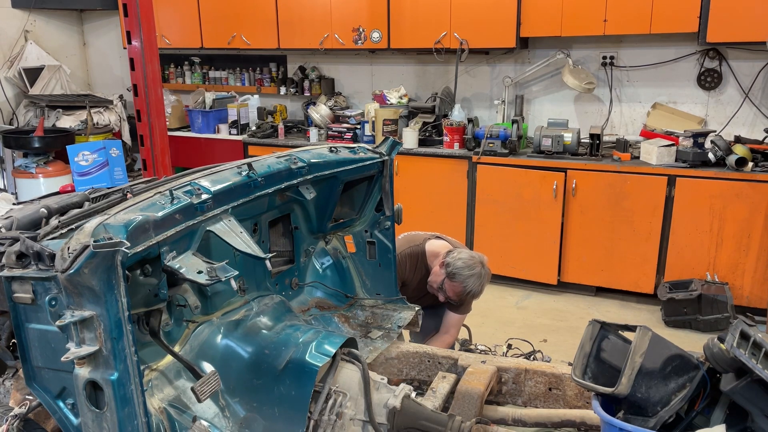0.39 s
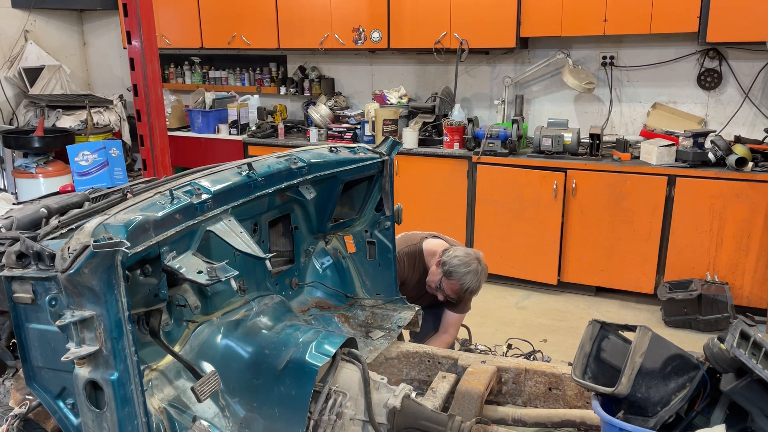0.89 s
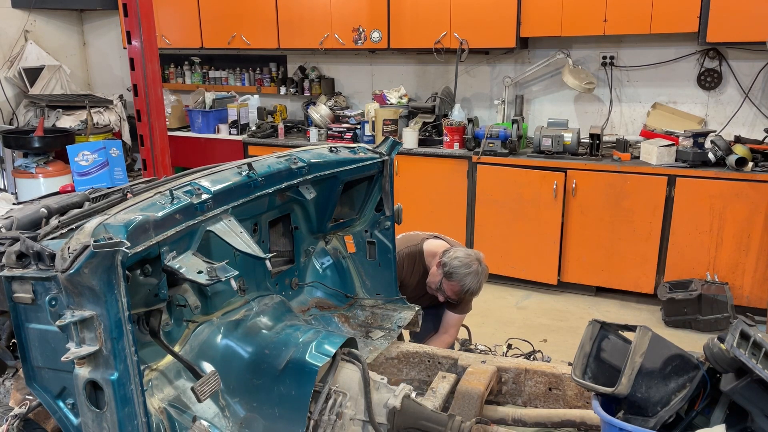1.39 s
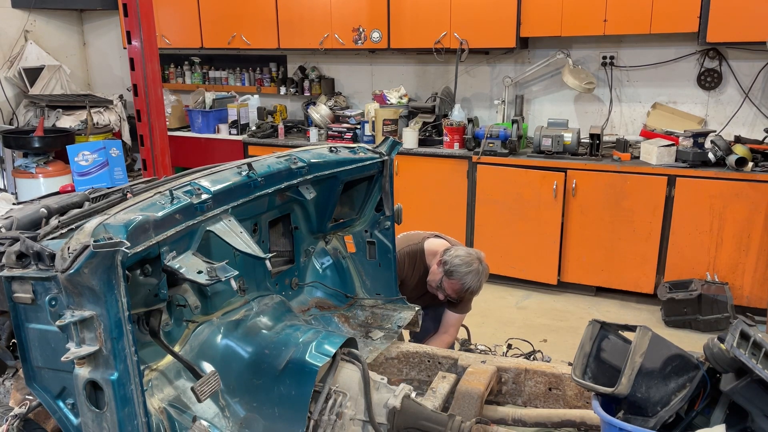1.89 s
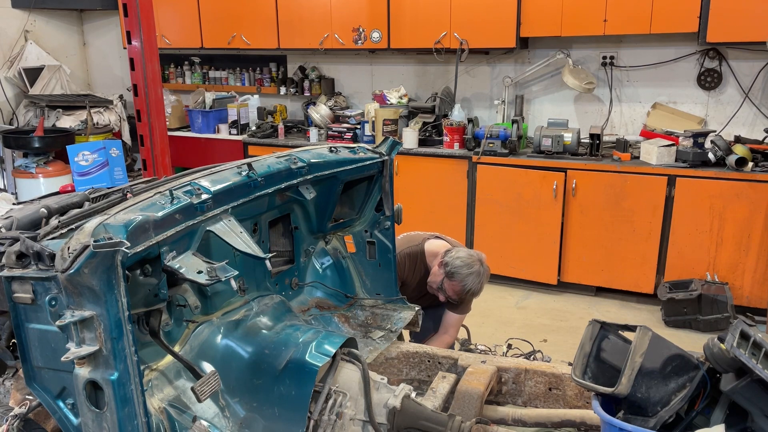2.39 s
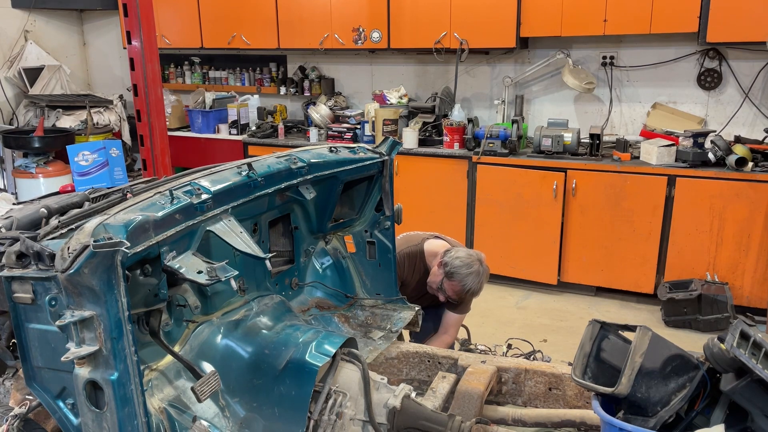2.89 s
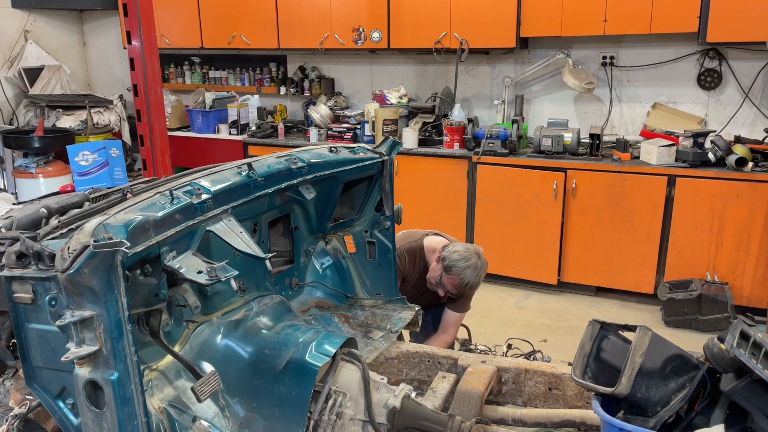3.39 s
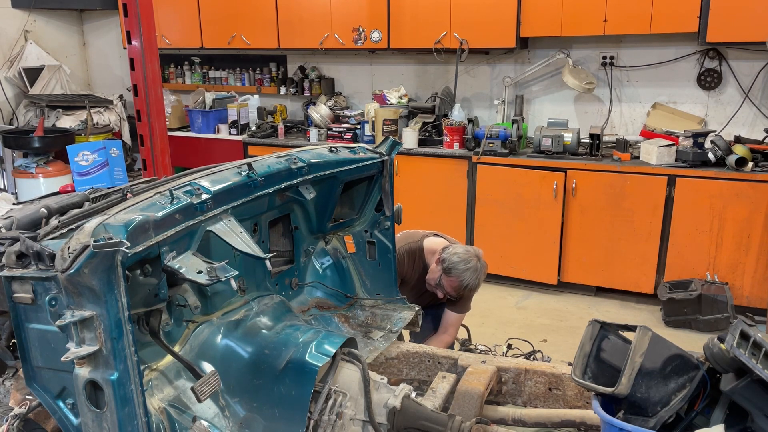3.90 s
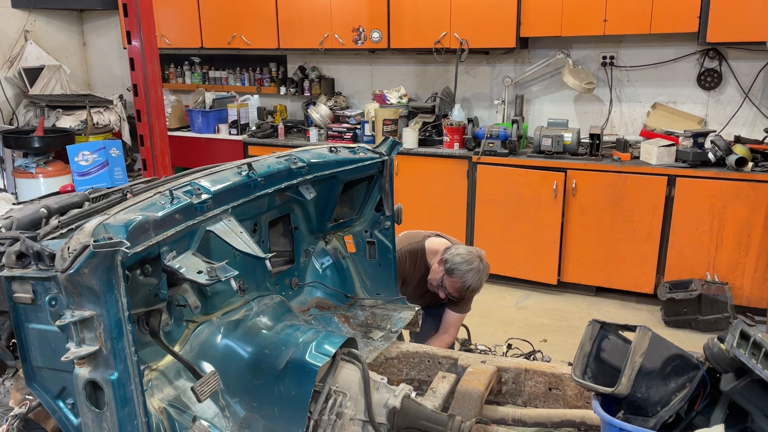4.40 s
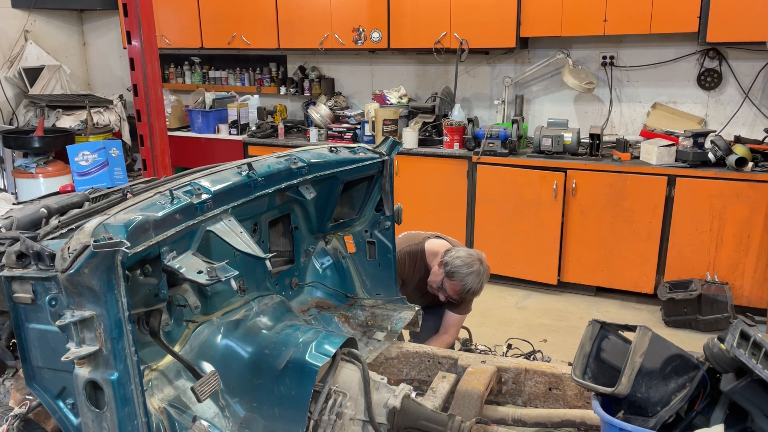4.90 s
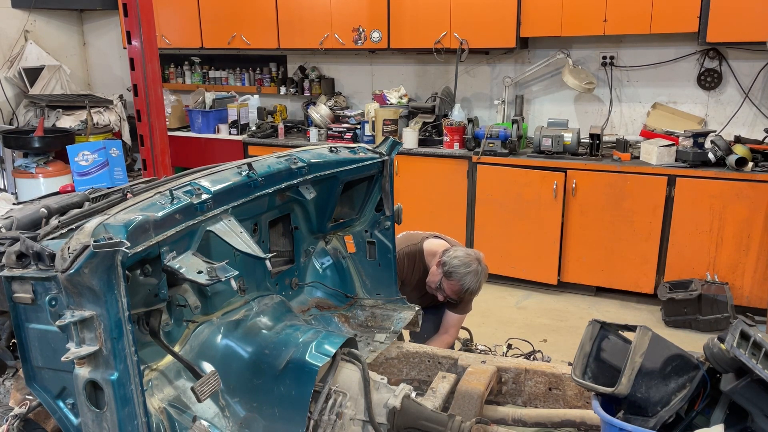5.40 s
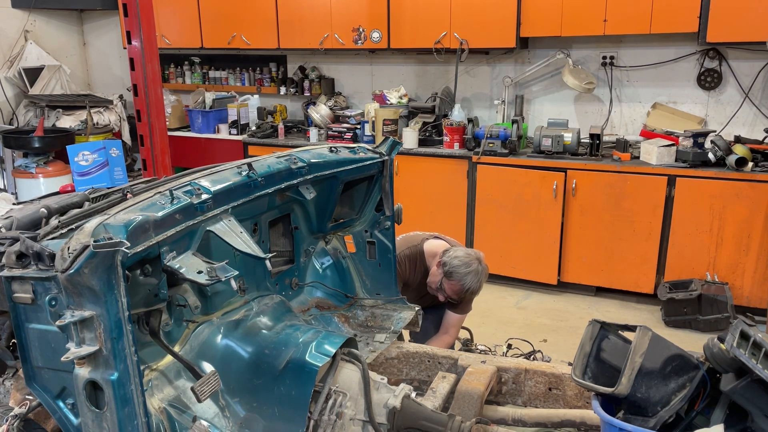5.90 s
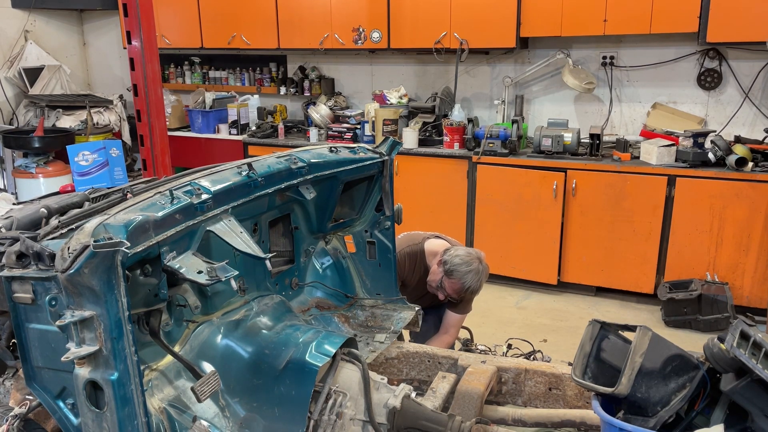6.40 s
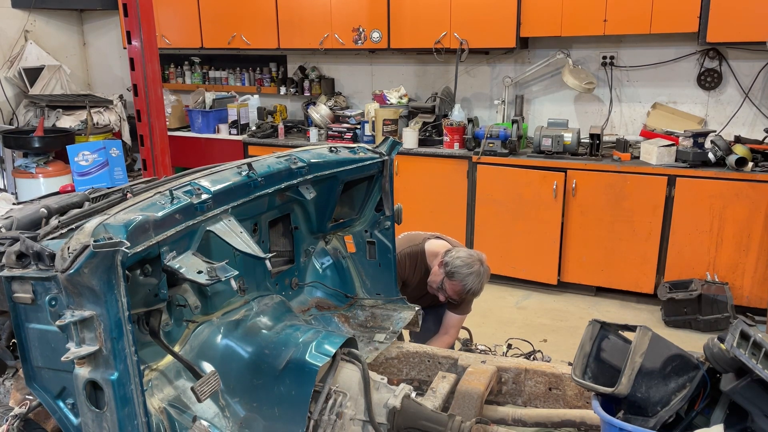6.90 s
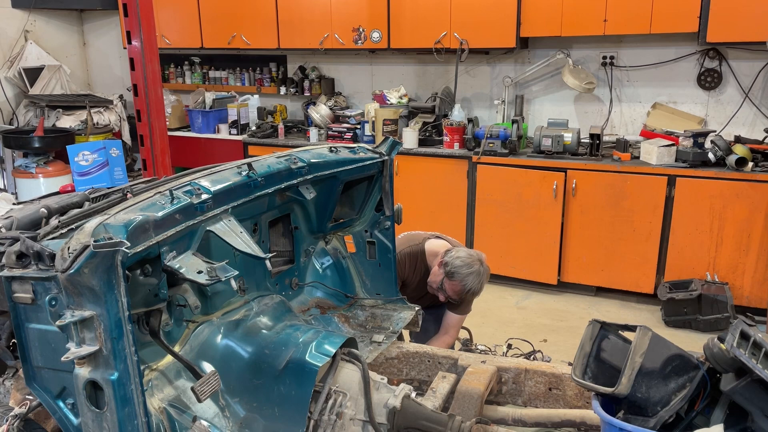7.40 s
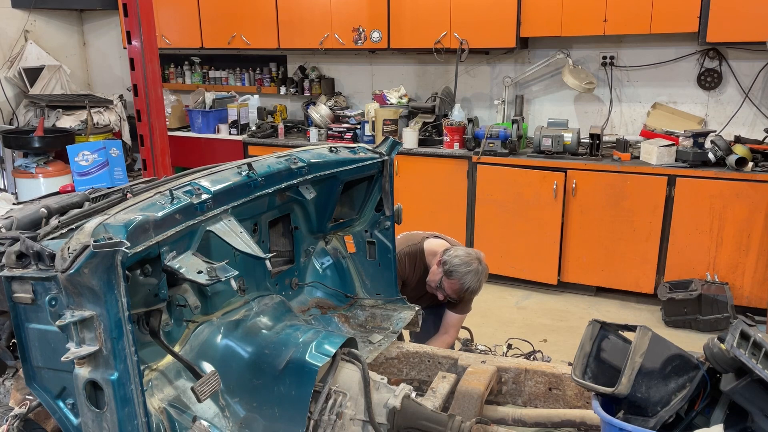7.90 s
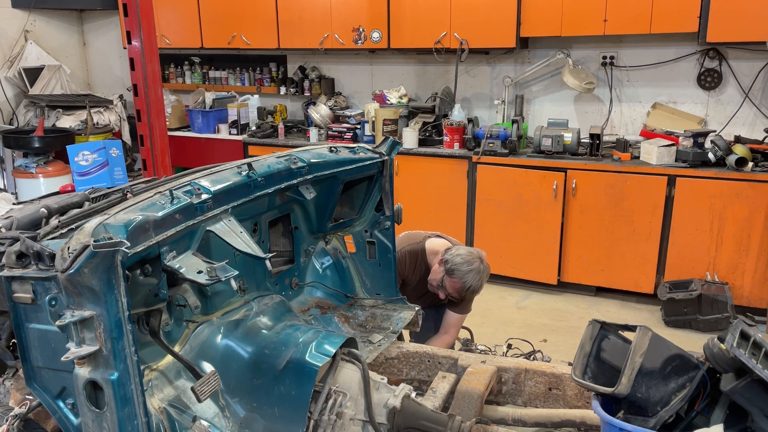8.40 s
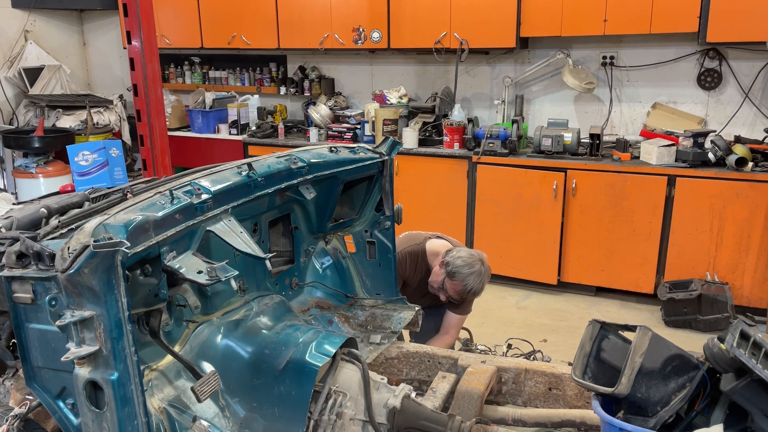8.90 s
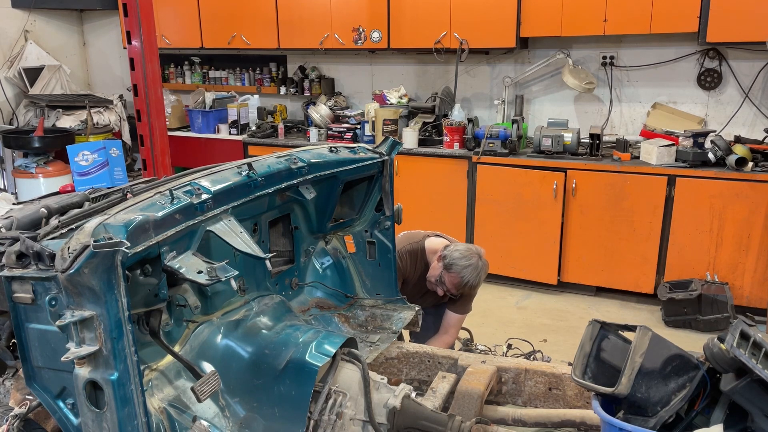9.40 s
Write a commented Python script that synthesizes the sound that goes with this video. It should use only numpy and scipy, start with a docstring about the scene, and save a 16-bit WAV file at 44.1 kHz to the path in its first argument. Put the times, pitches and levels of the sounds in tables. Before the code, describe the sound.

In a closed garage, a pneumatic impact wrench works on a bare car shell. A burst is already under way at the start, then four more follow, each about a second or less. Sharp metallic cracks rattle at roughly sixteen to twenty per second over rushing air, making steel panels boom and clang. Between bursts, short reverb fades to faint hum, ticks and rustling. Stereo microphone a few metres away.

```python
"""Impact wrench in a closed garage

An air impact wrench hammers a tight bolt on a bare steel car shell in five bursts. Each blow is a noise
crack and a socket ring, with damped sine modes for the panels that boom and clang. Filtered noise gives
the rush of the air motor and, in the pauses, faint rustling; small ticks are noise bursts with pings.
The room adds echoes and about half a second of diffuse tail, over steady air noise, hum and whine."""
import sys
import numpy as np
from scipy import signal
from scipy.fft import rfft, irfft, next_fast_len
from scipy.io import wavfile
from scipy.ndimage import uniform_filter1d

SR = 44100
rng = np.random.default_rng(int(sys.argv[2]) if len(sys.argv) > 2 else 0)


def attenuation_scalar(level_db):
    """Turn a level in dB into a linear amplitude multiplier (20 dB per decade)."""
    decades = np.asarray(level_db, float) / 20
    return 10 ** decades


def wav_out(sig):
    """Save sig, one row per channel (or a flat mono array), as 16-bit PCM at SR to the path in sys.argv[1]."""
    wavfile.write(sys.argv[1], SR, np.round(np.clip(np.atleast_2d(sig).T, -1, 1) * 32767).astype(np.int16))


N = 420273


def evened(x):
    """Scales a signal to an rms of one."""
    return x / np.sqrt(np.mean(x ** 2) + 1e-20)


def read(points, hz):
    """Reads a curve of (f/Hz, value) points along a logarithmic frequency axis."""
    f, value = np.transpose(points)
    return np.interp(np.log(hz + 1), np.log(f + 1), value)


def coloured(x, points):
    """Zero-phase filter along the last axis, from (f/Hz, gain/dB) points."""
    size = next_fast_len(x.shape[-1])
    gain = attenuation_scalar(read(points, np.fft.rfftfreq(size, 1 / SR)))
    return irfft(rfft(x, size) * gain, size)[..., :x.shape[-1]]


def clicks(s, db):
    """Single-sample impulses at the given seconds and levels."""
    x = np.zeros(N)
    at = np.clip(np.round(np.asarray(s) * SR).astype(int), 0, N - 1)
    np.add.at(x, at, attenuation_scalar(np.asarray(db)))
    return x


def ring(hz, t60, rise, turn=0):
    """One dying sine a row, swelling in over rise seconds, starting turn cycles into its phase."""
    t = np.arange(SR // 4) / SR
    fade = attenuation_scalar(-60 * t / np.maximum(t60, .01)[:, None]) * (1 - np.exp(-t / abs(rise)))
    return fade * np.sin(2 * np.pi * (hz[:, None] * t + turn))


def burst(s, db, rise, t60, colour):
    """Fresh noise under a sharp envelope at every hit."""
    t = np.arange(SR // 8) / SR
    shape = (1 - np.exp(-t / abs(rise))) * attenuation_scalar(-60 * t / abs(t60))
    envelope = signal.oaconvolve(clicks(s, db), shape)[:N]
    return envelope * evened(coloured(rng.standard_normal(N), colour))


def add(mix, s, sound):
    """Adds a sound into the mix at s seconds, trimmed where it overhangs either end."""
    at = round(s * SR)
    part, sound = mix[max(at, 0):], sound[max(-at, 0):]
    part[:len(sound)] += sound[:len(part)]


def background():
    """Diffuse room noise with hum lines whose pitch and level waver at random."""
    # hum and whine lines: f/Hz, relative level/dB
    hum_lines = [(62, -74.5), (118.4, -72), (280, -80), (420, -75.5), (587, -92), (613.7, -74.5),
                 (672, -100), (732, -73), (920, -76), (1034, -79.5), (1378, -83), (5165, -89)]
    # spectrum of the room noise: f/Hz, relative level/dB
    air_colour = [(25, -16), (58, 7), (121, -9), (413, -6), (745, -8.5), (1090, -16.5), (2420, -23.5),
                  (5200, -30.5), (7000, -33), (10000, -37.5), (13000, -39), (16000, -36.5)]
    t = np.arange(N) / SR
    out = evened(coloured(rng.standard_normal((2, N)), air_colour)) * attenuation_scalar(-59.5)
    for hz, db in hum_lines:
        waver = evened(uniform_filter1d(rng.standard_normal((2, N // 100 + 1)), 40, 1))
        drift, swell = np.repeat(waver, 100, 1)[:, :N]
        phase = hz * t + 2.0 * np.cumsum(drift) / SR + rng.random()  # drifts by about 2 Hz
        line = np.sqrt(2) * attenuation_scalar(db + 2.2 * swell) * np.sin(2 * np.pi * phase)
        out += line * np.array([[1], [.4]])
    return out * attenuation_scalar([[-0.5], [1.5]])


def motor(rows):
    """Exhaust rush, lumpy with the rattle of vanes; the shell rumbles most as the motor takes up the slack."""
    # trigger of the air motor: pressed t/s, released t/s, relative level/dB
    trigger = [(-.074, 0.598, -25.5), (1.827, 3.075, -27), (4.337, 5.299, -26.5), (6.486, 7.546, -27),
               (8.467, 9.122, -27.5)]
    # spectrum of the exhaust: f/Hz, relative level/dB
    rush_colour = [(300, -11), (900, 3), (1400, 0), (2500, -3.5), (5000, 0), (7000, 1), (11000, -2),
                   (16000, -8.5)]
    # spectrum of the shell's rumble: f/Hz, relative level/dB
    rumble_colour = [(40, -8), (100, -12.5), (200, -2), (400, -0.5), (800, -1.5), (1300, -12.5),
                     (2000, -27), (4000, -65)]
    sag_db_per_s = -3.0  # the air pressure drops
    open_s, open_db, stop_s = 0.018, -20.5, 0.03  # the valve opens from a faint leak; the motor runs down
    stall_db, stall_s, spin_up_s = -9.5, 0.024, 0.022
    t, level, slack_db = np.arange(N) / SR, np.zeros(N), np.zeros(N)
    for press, release, db in trigger:
        since = np.maximum(t - press, 0)
        held = (since > 0) * np.clip((release - t) / stop_s + 1, 0, 1)
        opening_db = open_db * np.exp(-(since / open_s) ** 2)
        level += attenuation_scalar(db + sag_db_per_s * since + opening_db) * held
        # the air hisses before the parts move
        slack_db += (6.9 * np.exp(-since / 0.068) - 21.0 * np.exp(-since / 0.024)) * held
    # each blow stalls the rotor, which then gathers speed again
    last_blow = np.maximum(np.searchsorted(rows[:, 0], t) - 1, 0)
    after = np.maximum(t - rows[last_blow, 0], 0)
    dip_db = stall_db * (1 - np.exp(-after / stall_s)) * np.exp(-(after / spin_up_s) ** 2 / 2)
    lumps_db = 2.44 * evened(uniform_filter1d(rng.standard_normal(N), 130))
    rush = evened(coloured(rng.standard_normal(N) * attenuation_scalar(lumps_db), rush_colour))
    rumble = evened(coloured(rng.standard_normal(N), rumble_colour)) * attenuation_scalar(slack_db + 0.1)
    return (rush + rumble) * level * attenuation_scalar(dip_db)


def blows():
    """Quick light blows until the bolt binds, then slower, boomier ones: rows of t/s, boom, clang, crack/dB."""
    # rhythm of each burst: first blow t/s, number of blows, gap/s while the socket is loose,
    # gap/s once the bolt binds, delay/s of the last blow
    rhythm = [(-.0213, 11, .0488, .0641, .0045), (1.8835, 20, .0456, .065, .0017),
              (4.3886, 16, .0503, .0633, .0088), (6.536, 17, .048, .065, .002),
              (8.5128, 11, .0509, .0641, .0132)]
    # force of each burst, relative levels: boom of the large panels/dB, boom while loose/dB,
    # clang of the small panels/dB, slope of the clang/(dB/s), crack of hammer on anvil/dB
    force = [(-26.5, -36.5, -32.5, 2, -18), (-26.5, -36, -28, -3, -17.5), (-26.5, -35, -30, -4, -17),
             (-27, -34.5, -28.5, -2.5, -18), (-26, -40.5, -29.5, -1, -18)]
    # blows that land squarely: t/s, extra crack/dB, extra clang/dB
    hard = [(.36, 2, 0), (2.02, 3.5, 0.5), (4.54, 1.5, -7), (4.83, 3.5, -0.5), (6.68, 6.5, -1),
            (7.04, 0.5, 1), (8.66, 4.5, -2.5), (9.03, 5.5, .1)]
    # free blows, then how many binding and the final delay take to build up
    loose_blows, bind_blows, tire_blows = 4.11, 1.11, .7
    boom_sag, crack_sag = -2, -4.0  # dB per s, as the air pressure drops
    late_db_per_ms, first_db, uneven_db = -0.74, -1.5, 0.88  # late and first blows are weak; all scatter
    rows = []
    for (first, count, quick, slow, delay), (boom, loose, clang, clang_sag, crack) in zip(rhythm, force):
        k = np.arange(count + 1)
        bound = np.maximum(1 - np.exp((loose_blows - k) / bind_blows), 0) * (k > loose_blows)
        late = delay * np.exp((k[:-1] - count + 1) / tire_blows)
        gap = quick + (slow - quick) * bound[:-1] + late
        since = np.cumsum(gap * (k[:-1] > 0))
        weak = late_db_per_ms * late * 1e3 + first_db * (k[:-1] == 0)
        boom_db = loose + (boom - loose) * bound[1:] + boom_sag * since + weak
        clang_db = clang + clang_sag * since + weak
        crack_db = crack + crack_sag * since + weak
        rows += zip(first + since, boom_db, clang_db, crack_db)
    rows = np.array(rows)
    rows[:, 1:] += uneven_db * rng.standard_normal((len(rows), 3))
    for s, crack_db, clang_db in hard:
        nearest = np.argmin(abs(rows[:, 0] - s))
        rows[nearest, 2:] += [clang_db, crack_db]
    return rows


def panels(s, boom_db, clang_db, spread_db):
    """Panel modes answer nearly alike each blow; the direction of turning changes which ones lead."""
    # panel modes: f/Hz, relative level/dB turning one way, relative level/dB turning the other way, t60/s
    panel_modes = [(61, -21, -31.5, 0.5), (98, -23, -13.5, 0.47), (113.6, -3, -15, 0.18),
                   (145.2, -7.5, -30.5, 0.42), (189.9, -8.5, -6, 0.27), (223.4, -2, -11.5, 0.45),
                   (262.1, -1, 1, 0.27), (281.6, 7, 4.5, 0.2), (306.4, 9, 5.5, 0.15), (321.2, 3, -1, 0.31),
                   (385, -15, -14, 0.097), (403, 8, -2.5, 0.091), (434, -8, 3.5, 0.27),
                   (510, 12.5, 9.5, 0.06), (577, -30.5, 6, 0.11), (597, -0.5, 2, 0.075),
                   (663, 1.5, -10.5, 0.12), (721, -3, -2.5, 0.18), (833.7, 2, 2.5, 0.13),
                   (900.5, 2.5, 2, 0.12), (988, -1, 5.5, 0.041), (1082.5, -2.5, 3, 0.077),
                   (1240, -17, -15.5, 0.029), (1331, -16.5, 4, 0.046), (1453, -1, -13, 0.039),
                   (1685, -2, -8.5, 0.084)]
    # heavily damped frame modes: f/Hz, relative level/dB one way, relative level/dB the other way, t60/s
    frame_modes = [(255, 18, 18, .05), (420, 15, 10, .035), (640, 14, 16, .03), (1100, 7, 7, .02)]
    # spans in which the wrench turns the other way: start t/s, end t/s
    reversed_spans = [(1.8, 3.1), (6.4, 7.6)]
    large_hz = 410  # modes below this belong to the large panels
    turn_spread = 0.14  # scatter of the small panels' starting phase, in cycles
    hz, ahead_db, back_db, t60 = np.transpose(panel_modes + frame_modes)
    large, out = hz < large_hz, np.zeros(N)

    def modes(turn):
        """Large panels swell in more slowly than small ones."""
        return np.where(large[:, None], ring(hz, t60, 0.0043, turn), ring(hz, t60, 0.0011, turn))

    sine, cosine = modes(0), modes(1 / 4)
    chance = rng.standard_normal((len(s), 2, len(hz)))
    for at, boom, clang, (luck, twist) in zip(s, boom_db, clang_db, chance):
        back = any(a < at < b for a, b in reversed_spans)
        strike_db = np.where(large, boom, clang + spread_db * luck)
        gains = attenuation_scalar((back_db if back else ahead_db) + strike_db)
        angle = 2 * np.pi * turn_spread * twist * ~large
        sound = gains * np.cos(angle) @ sine + gains * np.sin(angle) @ cosine
        add(out, at + 0.002958, sound)  # the panels answer 3 ms after the blow
    return out


def hammer(rows):
    """The crack of hammer on anvil and a loose socket that rings differently every time, with the panels."""
    # socket and anvil ring: f/Hz, relative level/dB, t60/s
    socket_modes = [(2114, -11, 0.21), (2504, -0.5, 0.099), (3140, -16, 0.12), (3500, -32, .05),
                    (3816, 13.5, 0.028), (4740, 6.5, 0.05), (5200, -32, .04)]
    # spectrum of the crack: f/Hz, relative level/dB
    crack_colour = [(400, -18), (1200, 4.5), (2500, 0.5), (5000, -5), (7000, -1.5), (11000, -7),
                    (16000, -8)]
    s, boom_db, clang_db, crack_db = rows.T
    hz, db, t60 = np.transpose(socket_modes)
    out = panels(s, boom_db, clang_db, 2.28) + burst(s, crack_db, 0.00092, 0.059, crack_colour)
    sine, cosine = ring(hz, t60, 0.00084), ring(hz, t60, 0.00059, turn=1 / 4)
    chance = rng.standard_normal((len(s), 2, len(hz)))
    for at, crack, luck in zip(s, crack_db, chance):
        gains = attenuation_scalar(crack + db - 24.0) * luck  # random level and phase for every mode
        add(out, at, gains[0] @ sine + gains[1] @ cosine)
    return out


def ticks():
    """Short noise ticks of metal parts settling, each with a brief sine ping and a knock in the panels."""
    # ticks and knocks of tool and parts: t/s, relative tick level/dB, relative panel knock level/dB,
    # ping f/Hz, relative ping level/dB
    tick_events = [(1, -49.5, -70, 2900, -51), (1.5163, -60, -86.5, 2750, -59),
                   (3.2002, -43, -76, 3200, -55), (3.307, -49, -85, 3600, -60),
                   (3.4185, -48.5, -81, 3050, -49), (3.6469, -39, -62.5, 4320, -51.5),
                   (5.817, -50, -76, 3400, -59), (6.506, -38, -42, 3920, -41),
                   (7.5586, -27.5, -65, 4570, -40), (8.486, -42, -42, 3900, -44),
                   (9.469, -56.5, -82.5, 3000, -71)]
    # spectrum of a tick: f/Hz, relative level/dB
    tick_colour = [(200, -9), (400, -17), (1200, 6), (3000, 0), (5000, 3), (9000, 6.5), (16000, -21)]
    s, db, knock_db, hz, ping_db = np.transpose(tick_events)
    out = burst(s, db, 0.00033, 0.05, tick_colour) + panels(s, knock_db, knock_db - 3.0, 4.0)
    pings = attenuation_scalar(ping_db)[:, None] * ring(hz, np.full(len(s), .012), .0004)
    for at, ping in zip(s, pings):
        add(out, at, ping)
    return out


def rustle():
    """Soft grainy noise that swells and fades in the pauses."""
    # faint rustling: start t/s, length/s, relative level/dB
    rustle_events = [(1.5, 0.59, -71.5), (3.413, 0.12, -75), (3.645, .12, -55.5), (5.824, 0.86, -77.5),
                     (7.582, 0.079, -52), (8.02, 0.65, -74)]
    # spectrum of the rustling: f/Hz, relative level/dB
    rustle_colour = [(600, -20.5), (1500, -7.5), (2400, 3), (3500, -9), (4500, -3), (6500, -6.5),
                     (12000, -17), (16000, -28)]
    t, level = np.arange(N) / SR, np.zeros(N)
    for s, length, db in rustle_events:
        progress = np.clip((t - s) / length, 0, 1)
        level += attenuation_scalar(db) * np.sin(np.pi * progress ** 0.49)  # swells faster than it fades
    grain_db = 6.1 * evened(uniform_filter1d(rng.standard_normal(N), 500))
    return level * evened(coloured(rng.standard_normal(N) * attenuation_scalar(grain_db), rustle_colour))


def tails():
    """Two unrelated tails of random-sign reflections whose bands die at their own speed."""
    # reverberation time of the garage: f/Hz, t60/s
    decay = [(100, 0.82), (260, 0.64), (700, 0.64), (1840, 0.64), (4850, 0.55), (12000, 0.29)]
    # loudness of the diffuse tail: f/Hz, relative level/dB
    wet_colour = [(100, -6), (300, -4.5), (600, -4.5), (1500, -1.5), (5000, -3.5), (12000, -1.5)]
    taps = np.zeros((2, SR))
    at = np.arange(300, SR - 6, 6)
    at = at + rng.integers(0, 6, (2, len(at)))
    np.put_along_axis(taps, at, rng.choice([-1., 1.], at.shape), 1)
    hz, t, z = signal.stft(taps, SR, nperseg=512)
    fade = attenuation_scalar(-60 * t / read(decay, hz)[:, None])
    tail = signal.istft(z * fade, SR, nperseg=512)[1]
    return coloured(tail / np.linalg.norm(tail[0]), wet_colour) * attenuation_scalar([[0], [2]])


def garage(x):
    """The direct sound, a few wall echoes and a varying diffuse tail, as sum and difference."""
    # first wall echoes: delay t/s, relative level/dB
    echoes = [(.0105, -9), (.017, -6), (.033, -9), (.048, -13)]
    # dull colour of those echoes: f/Hz, gain/dB
    wall_colour = [(300, -1.5), (1200, -1), (4000, -14), (12000, -18)]
    cycle_s = .41  # three random diffuse tails take turns, so that the reverberation keeps varying
    early = np.zeros((2, SR // 10))
    for s, db in echoes:
        early[:, round(s * SR)] = attenuation_scalar(db) * np.array([1, .4])
    early = coloured(early, wall_colour)
    early[:, 0] += [1, -.35]  # the direct sound, a little to the right
    out = signal.oaconvolve(x[None], early, axes=1)[:, :N]
    for k in range(3):
        turn = np.cos(np.pi * (np.arange(N) / SR / cycle_s + k / 3))
        share = np.sqrt(2 / 3) * abs(turn)  # the squares of the three shares add up to one
        out += signal.fftconvolve((share * x)[None], tails(), axes=1)[:, :N]
    return out * attenuation_scalar(-1.61)


def scene():
    """Sum and difference of the sound, each with its own spectrum, turned into left and right."""
    # spectrum of the sum signal, with deep gaps near 8 and 14.5 kHz: f/Hz, gain/dB
    both_spectrum = [(20, -23), (60, -1.5), (150, 5.5), (5000, 3.5), (6800, -3.5), (7400, -9),
                     (8000, -61.5), (8700, -16.5), (9400, -2), (12500, -1.5), (13700, -8), (14500, -25.5),
                     (15200, -18), (15700, -4)]
    # spectrum of the difference signal, with a deep gap near 11 kHz: f/Hz, gain/dB
    apart_spectrum = [(20, -33), (60, -15), (200, -6.5), (400, 0), (1300, 3), (2500, -0.5), (8000, 2.5),
                      (9800, 0), (10500, -28.5), (11300, -40), (12300, -10), (13200, 2.5), (16000, 2.5)]
    rows = blows()
    field = garage(hammer(rows) + motor(rows) + ticks() + rustle()) + background()
    both, apart = coloured(field[0], both_spectrum), coloured(field[1], apart_spectrum)
    return np.array([both + apart, both - apart])


def low_pass(x):
    """Removes everything above the highest recorded frequency."""
    return signal.sosfilt(signal.butter(12, 16030, fs=SR, output="sos"), x)


def record(dry):
    """The converter rounds off the highest peaks."""
    mix = 1.336 * np.tanh(dry / 1.26)
    return low_pass(mix)


dry = scene()
out = record(dry)
wav_out(out)
```